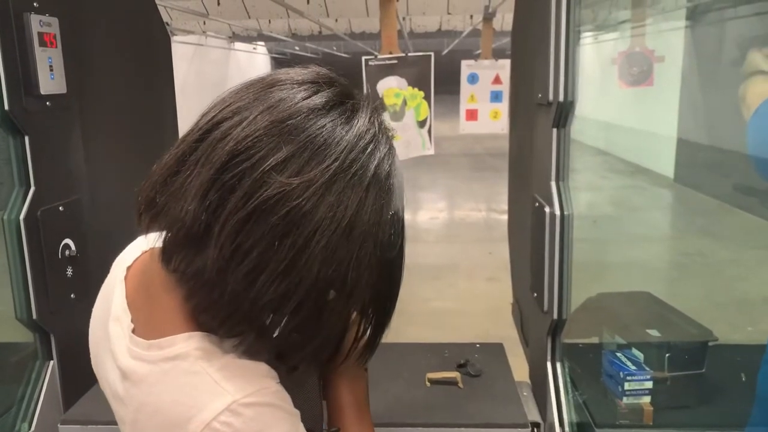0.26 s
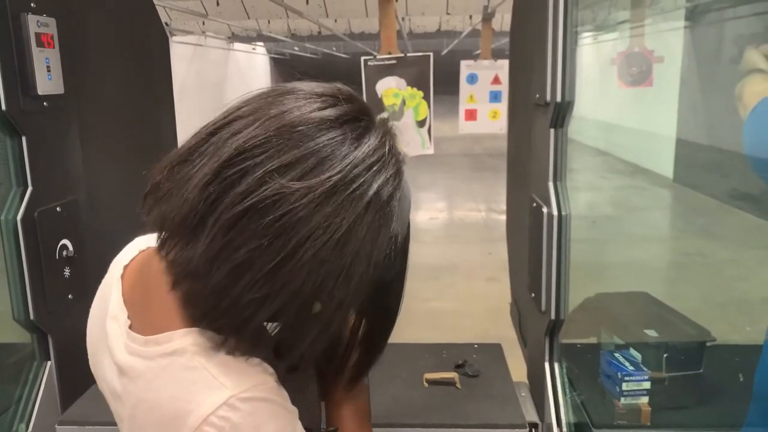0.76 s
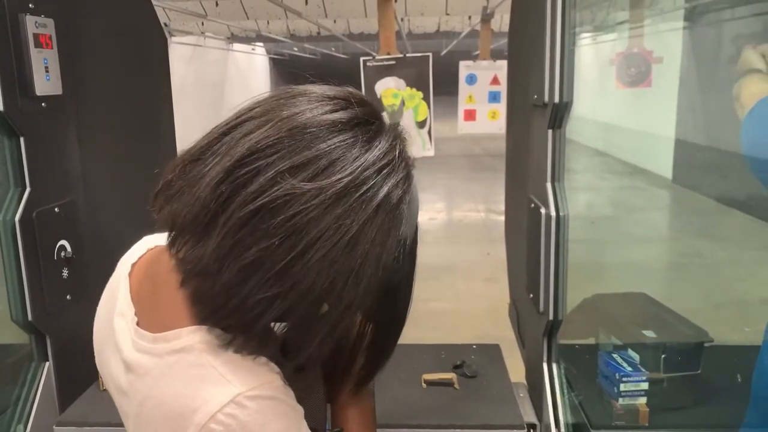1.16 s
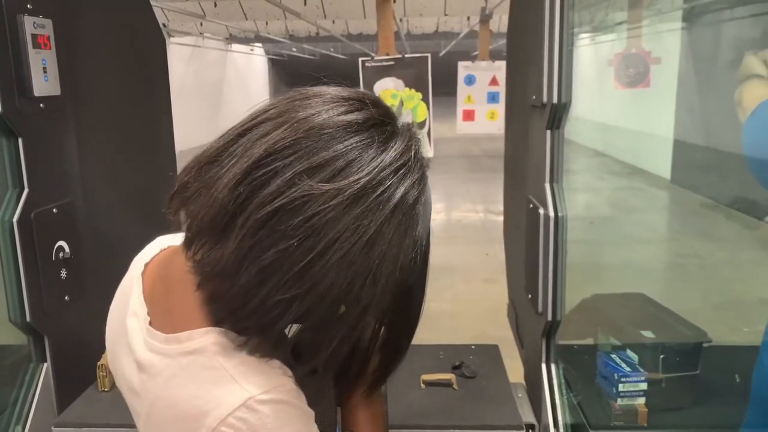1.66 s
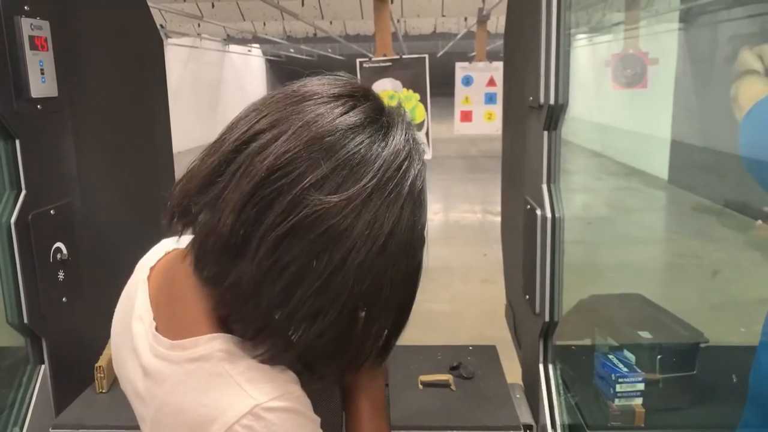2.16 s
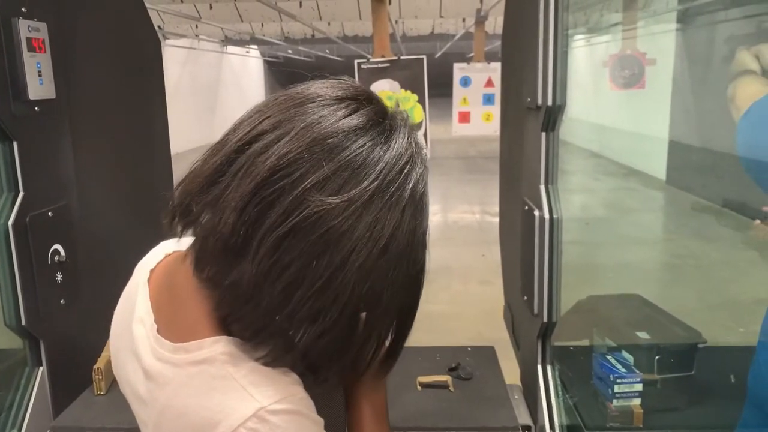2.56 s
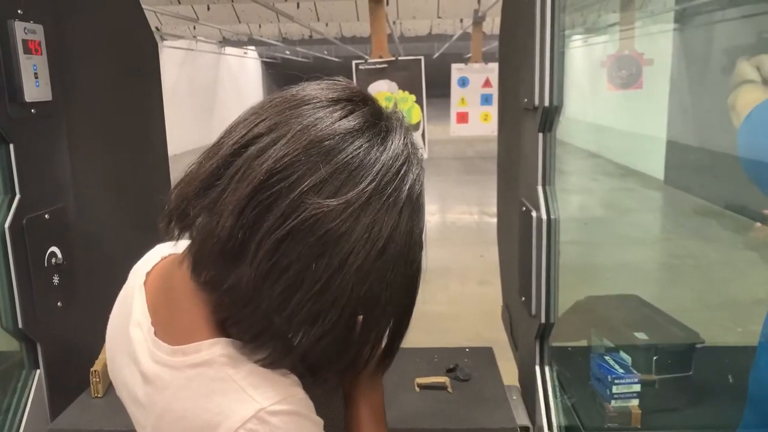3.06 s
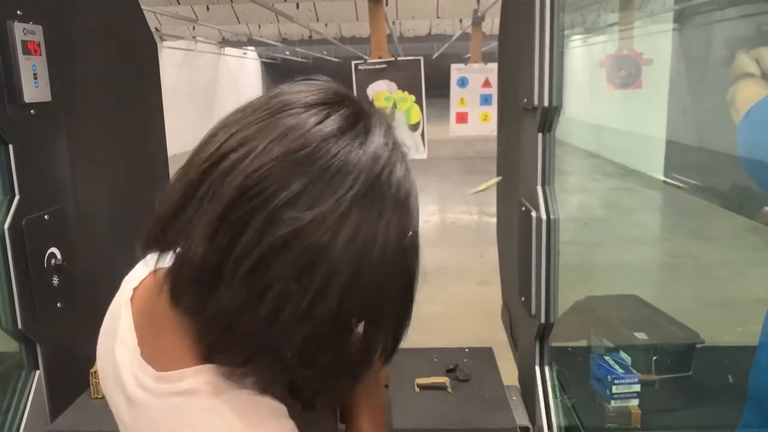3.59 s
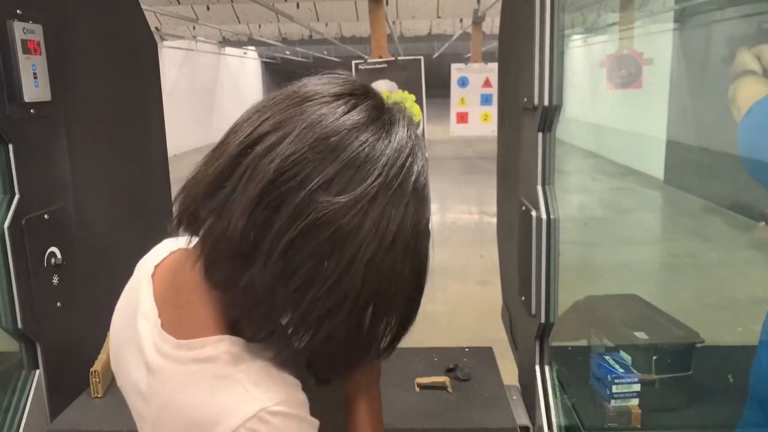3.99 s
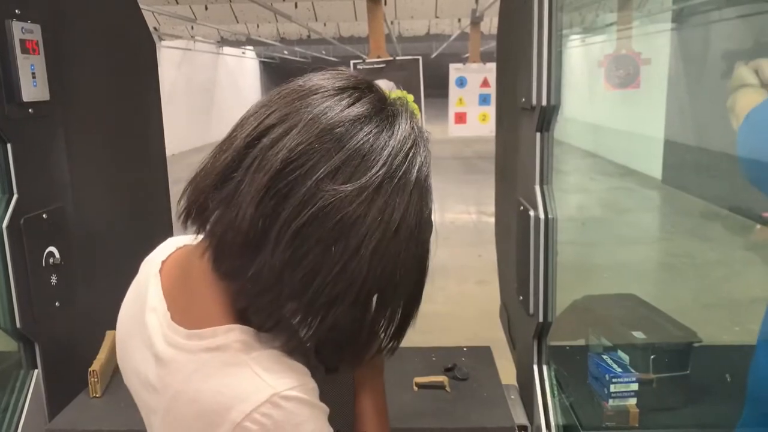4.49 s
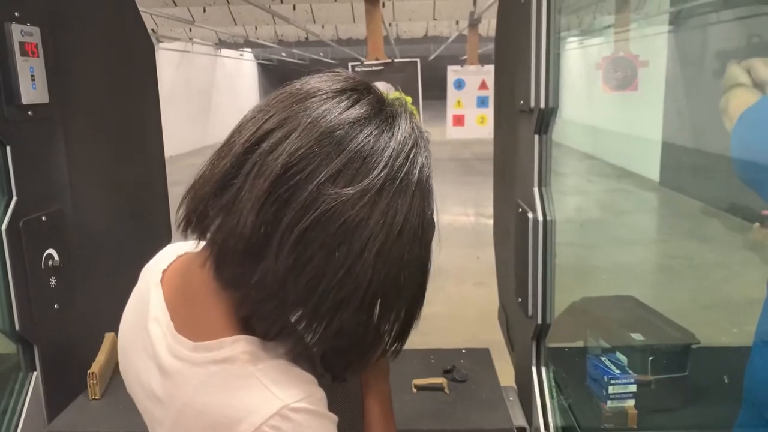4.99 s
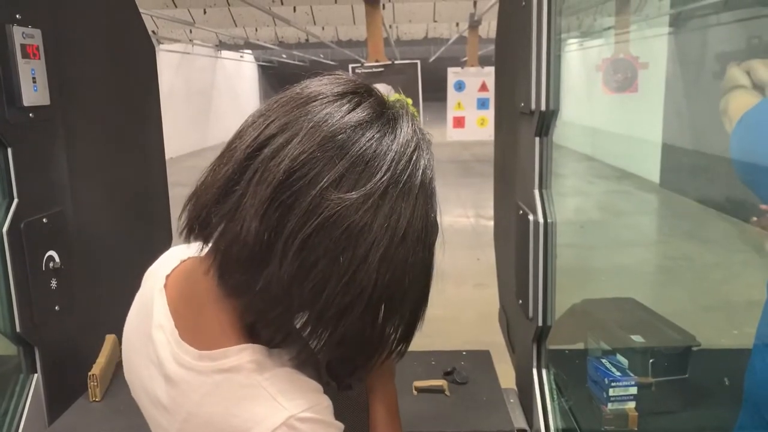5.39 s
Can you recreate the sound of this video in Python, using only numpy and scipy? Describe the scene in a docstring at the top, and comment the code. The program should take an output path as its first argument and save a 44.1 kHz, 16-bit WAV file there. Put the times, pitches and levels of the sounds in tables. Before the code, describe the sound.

The sound opens on the ringing tail of a rifle shot in an indoor shooting range, heard in wide stereo from inside a booth. Loud, sharp rifle shots follow from three neighbouring lanes, each lane slightly different in tone, at about 1.2, 1.6, 2.5 and 3.3 seconds, then a quick pair at 3.9 and 4.0. Each blast rattles briefly around the booths, slaps back from the far end and rings through the hall for a second or two. The shot at 3.3 seconds has a heavier, swelling echo. Spent brass cases tick very faintly on the floor early on, then tinkle more clearly with thin, high pings at about 4.6 and 5.0 seconds, followed by small bounces. One last shot cracks at about 5.6 seconds, right at the end. A faint, low ventilation hum continues underneath.

```python
"""First the ringing tail of a rifle shot, then more shots from three neighbouring lanes of an indoor range.
The microphone stands in a booth. Each blast rattles round the nearby booths and dies fast; a slap
returns from the far end of the hall. The long tail is held down just after the blast, then swells
back up after the slap. Shots from one lane share their echoes.
Spent brass cases tinkle on the floor over the hum of the ventilation."""
import sys
import numpy as np
from scipy import signal
from scipy.fft import rfft, irfft
from scipy.io import wavfile
from scipy.ndimage import uniform_filter1d

SR = 44100
rng = np.random.default_rng(int(sys.argv[2]) if len(sys.argv) > 2 else 0)


def waveform_to_disk(signal):
    """Save audio, clipped to [-1, 1], as 16-bit WAV at the path in sys.argv[1]."""
    frames = np.transpose(np.atleast_2d(signal))
    scaled = np.clip(frames, -1, 1) * 32767
    samples = np.round(scaled).astype(np.int16)
    wavfile.write(sys.argv[1], SR, samples)


N = 248708

# Rifle shots: start_s, lane, blast_db, tail_db
RIFLE_SHOTS = [(-.3, 0, -12, -31), (1.183, 0, -15, -29.5), (1.601, 1, -11.5, -27.5), (2.506, 0, -13.5, -28),
               (3.297, 2, -14, -18.5), (3.872, 1, -12, -32), (3.984, 0, -15, -31.5), (5.64, 0, -16.5, -22)]
# Muzzle blast at the microphone, a list per lane: frequency_hz, relative_density_db
BLAST_SPECTRA = [
    [(24, -32), (40, -7), (353, -8), (616, -10), (699, -8), (971, -3), (1190, -10), (3030, -18),
     (5430, -18.5), (6320, -20.5), (8350, -29), (10500, -24.5), (15300, -31.5), (17000, -52)],
    [(24, -36.5), (40, -8), (207, -9), (353, -10), (543, -21), (616, -1.5), (735, -1.5), (1130, -10.5),
     (5160, -24.5), (6480, -22.5), (8790, -32.5), (9970, -25), (15300, -33.5), (17000, -84)],
    [(24, -50), (40, -5.5), (183, -9.5), (311, -23.5), (556, -5), (681, -12), (1160, -14), (1530, -18),
     (5300, -24.5), (7180, -25.5), (8570, -39), (9720, -29.5), (15300, -34), (17000, -66.5)],
]
# Course of a shot from each lane: rise_s, blast_bass_db, partition_echo_db, slap_s, swell_s,
# tail_tilt_db_per_octave, before_swell_db
LANE_COURSES = [(0.0018, -4.5, -2, 0.1579, 0.046, 0.2, -1), (0.0029, -4, -12.5, .144, 0.04, 1.52, 6.5),
                (0.0024, -1.5, -24.5, .119, 0.34, 2.5, -9)]
# Attack and ring of each lane: booth_ring_factor, booth_build_s, knock_over_slap_db,
# slap_tilt_db_per_octave, crack_db
LANE_CHARACTER = [(1.2, .002, 5.5, 0.27, 2.5), (1.2, 0.0034, 9.5, 1, -6), (1.5, .012, 2.5, 1.5, 1.5)]
# Balance of each lane: booth_ring_db, slap_db, tilt_db_per_octave, tail_bass_db
LANE_BALANCE = [(-4, -12.5, 1.49, 3.2), (-3, -10.5, -0.52, 0), (0, -8.5, 1.37, 11.5)]
# Bass comes round the partitions later: frequency_hz, delay_s
PARTITION_DELAY = [(100, 0.012), (600, 0.01095), (2000, 0.0017), (8000, 0.0013)]
# Decay of the quick echoes round the booths: frequency_hz, t60_s
BOOTH_DECAY = [(60, 0.94), (250, .3), (800, 0.17), (3000, 0.24), (8000, 0.23), (15000, .2)]
# Booth resonances on the way to the microphone, a list per lane: pitch_hz, base_width_hz, weight_db
BOOTH_MODES = [
    [(97, 91, 13), (570, 30, 8), (910, 68, -10.5), (1320, 30, -11.5), (2180, 11, -15), (2830, 13, 2),
     (2960, 27, -16), (3180, 71, -14.5), (4100, 65, -1), (5300, 86, -11.5)],
    [(80.7, 89, -2.5), (403, 19, 0), (701, 47, -5), (1035, 11, -1.5), (1423, 210, -9), (1445, 25, -13),
     (2000, 37, -14), (2400, 75, -19), (2900, 29, -16.5), (4270, 66, -6.5)],
    [(100, 5.7, 0), (170.5, 36, -8), (510, 20, 9.5), (546.4, 10, 3.5), (704, 25, -7), (800, 39, -10.5),
     (1533, 64, 10.5), (1820, 22, -1), (2580, 62, -12), (3160, 22, -5)],
]
# Decay of the slap from the far end: frequency_hz, t60_s
SLAP_DECAY = [(250, 0.21), (800, 0.28), (3000, 0.28), (12000, 0.15)]
# Colour of the slap against the blast: frequency_hz, gain_db
SLAP_TONE = [(80, 5.5), (300, -5.5), (800, -1.5), (3000, 0), (12000, -3.5)]
# Knock in the slap, a list per lane: pitch_hz, base_width_hz, weight_db
KNOCK_MODES = [
    [(724, 74, 13.5), (1170, 10, -8), (1335, 22, 0), (1740, 220, -28), (2230, 33, -54)],
    [(658.5, 23, 7), (1120, 130, -5), (1466, 23, -6.5), (1980, 78, -8.5), (2370, 47, -10)],
    [(576, 120, -5), (838, 19, 0), (1250, 44, 1), (1530, 65, 5), (2120, 58, -3)],
]
# Long tail of the hall: frequency_hz, relative_density_db
HALL_SPECTRUM = [(18, -42.5), (30, -23.5), (76, -6.5), (151, -2.5), (425, -20.5), (686, 0), (1110, -10),
                 (1230, -10.5), (1980, -19.5), (6710, -30), (8520, -41), (11100, -36), (13400, -76.5),
                 (14500, -47), (17000, -101)]
# Decay of that tail: frequency_hz, t60_s
HALL_DECAY = [(50, 3.26), (120, 1.67), (300, 2.15), (700, 1.59), (1500, 1.584), (3000, 1.656),
              (6000, 1.215), (10000, 0.66), (15000, 0.65)]
# How far the tail is held down just after the blast: frequency_hz, gain_db
TAIL_DIP = [(80, -18), (300, -3.5), (1000, -11.5), (8000, -12)]
# Stereo width at the microphone: frequency_hz, side_minus_mid_db
STEREO_WIDTH = [(60, -5.5), (110, -29), (200, -5), (380, 10.5), (700, -1.5), (1290, -2), (2380, -0.5),
                (4400, -1), (8120, 1.5), (15000, -2.5)]
# Cases hit the floor: start_s, landing (0 wide case, 1 slim on its rim, 2 slim flat), ring_db, tick_db
CASE_DROPS = [(.451, 0, -71, -62), (.71, 0, -75, -89), (.86, 0, -84, -95), (.96, 0, -82, -95),
              (2.464, 0, -66, -49), (3.124, 0, -66, -55), (4.551, 1, -42, -50), (4.679, 0, -73, -56),
              (4.682, 2, -70, -75), (4.972, 1, -33.5, -53.5), (5.195, 2, -67, -69), (5.275, 1, -56, -66),
              (5.315, 2, -75, -70), (5.394, 0, -71, -73), (5.488, 2, -58, -68), (5.618, 2, -57, -58)]
# Modes of a brass case: pitch_hz, base_t60_s, wide_db, slim_rim_db, slim_flat_db
BRASS_MODES = [(10020, .45, 0, -48, -30), (10660, .4, -20, -31, -7), (14940, .36, -20, 0, -3),
               (15220, .28, -22, -16, 0)]
# Ventilation hum: frequency_hz, relative_density_db
VENT_SPECTRUM = [(15, -48.5), (25, -17.5), (65, 6), (261, -1.5), (427, -36), (576, -17.5), (643, -6),
                 (717, -9), (799, -14), (1670, -21), (1810, -20), (2450, -28.5), (17000, -59)]
# Notches of the microphone housing: centre_hz, width_hz, gain_db
HOUSING_NOTCHES = [(5430, 400, -8.5), (8550, 240, -19.5), (13430, 750, -15.5), (16700, 500, -14.5)]

SHOT_SAMPLES, STEP_SAMPLES, LEAD_S = 3 * SR, 32, .05  # one shot, its envelope step, time before the blast
TAPS_PER_S, PARTITION_ECHO_S = 14000, .041
TICK_T60_S, TICK_TAIL_DB, TICK_TAIL_T60_S = .02, -25.5, .15
QUICK_FACTOR, SLOW_FACTOR, SLOW_DB, WAVER_DEPTH = .4, 1.5, -13.5, .3  # brass fades in two stages
VENT_DB, BAND_LIMIT_HZ = -61.5, 16900


def rifle_shots():
    """Blast, booth ring, knock and hall tail, in mid and side; one set of echoes for each lane."""
    out = np.zeros((2, N + 2 * SHOT_SAMPLES))
    shape = (2, SHOT_SAMPLES)
    for lane, course in enumerate(LANE_COURSES):
        ring_factor, build_s, knock_db, slap_tilt, crack_db = LANE_CHARACTER[lane]
        ring_db, slap_db, tilt, tail_bass_db = LANE_BALANCE[lane]
        # Early echoes are separate taps of uneven size; the tail is dense.
        taps = rng.standard_normal(shape) * (rng.random(shape) < TAPS_PER_S / SR)
        early = split_bands(coloured(taps, BLAST_SPECTRA[lane]))
        dense = split_bands(coloured(rng.standard_normal(shape), HALL_SPECTRUM))
        dense = hall_drift(dense, depth_db=1.9)
        booth = resonances(BOOTH_MODES[lane], LEAD_S, ring_factor, build_s)
        knock = resonances(KNOCK_MODES[lane], LEAD_S + course[3], ring_factor=.84, build_s=.003)
        blast = shaped(early, blast_power, course, slap_db, tilt, slap_tilt, crack_db)
        blast = blast + gain_of(ring_db) * booth + gain_of(slap_db + knock_db) * knock
        tail = shaped(dense, hall_power, course, tilt, tail_bass_db)
        for start_s, shot_lane, blast_db, tail_db in RIFLE_SHOTS:
            if shot_lane == lane:
                at = SHOT_SAMPLES + round((start_s - LEAD_S) * SR)
                out[:, at:at + SHOT_SAMPLES] += gain_of(blast_db) * blast + gain_of(tail_db) * tail
    return out[:, SHOT_SAMPLES:SHOT_SAMPLES + N]


def blast_power(t, hz, course, slap_db, tilt, slap_tilt, crack_db):
    """Muzzle blast with quick booth echoes close by, one partition echo, and the slap from the far end."""
    rise_s, bass_db, echo_db, slap_s = course[:4]
    late_s = value_at(PARTITION_DELAY, hz)
    burst = rise_and_fall(t - late_s, rise_s / (1 + (hz / 6000) ** 2) + .1 * late_s,
                          value_at(BOOTH_DECAY, hz))
    crack = rise_and_fall(t - .5 * late_s, .0004, .09)  # the first arrivals stand out
    burst *= 1 + gain_of(2 * crack_db) * crack
    echo = rise_and_fall(t - PARTITION_ECHO_S, .0004 + .2 * late_s, .025)
    burst += gain_of(2 * echo_db) * echo * hz / (hz + 3000)
    slap = rise_and_fall(t - slap_s - .002, .0015 + .15 * late_s, value_at(SLAP_DECAY, hz))
    slap_db = slap_db + value_at(SLAP_TONE, hz) + tone_db(hz, tilt + slap_tilt, 0)
    return gain_of(2 * tone_db(hz, tilt, bass_db)) * burst + gain_of(2 * slap_db) * slap


def resonances(modes, start_s, ring_factor, build_s):
    """Room modes build up over milliseconds, and wide ones die sooner; mid and side differ in phase."""
    hz, width_hz, weight_db = np.transpose(modes)[:, :, None]
    t = np.maximum(np.arange(SR // 2) / SR - start_s - .548 * value_at(PARTITION_DELAY, hz), 0)
    phase = rng.random((2, *hz.shape))
    rings = gain_of(weight_db) * np.sqrt(width_hz / 50) * np.sin(2 * np.pi * (hz * t + phase))
    rings *= gain_of([0 * hz, value_at(STEREO_WIDTH, hz) - 4.5])
    envelope = (1 - np.exp(-t / build_s)) * np.exp(-np.pi * width_hz * t / ring_factor)
    return np.pad((rings * envelope).sum(1), ((0, 0), (0, SHOT_SAMPLES - SR // 2)))


def hall_power(t, hz, course, tilt, bass_db):
    """The long tail is held down just after the blast, then swells back up after the slap."""
    slap_s, swell_s, tail_tilt, before_db = course[3:]
    t60_s = value_at(HALL_DECAY, hz)
    held = min(gain_of(2 * (value_at(TAIL_DIP, hz) + before_db)), 1)
    swell = held + (1 - held) * (1 - np.exp(-(np.maximum(t - slap_s, 0) / swell_s) ** 2))
    level_db = 60 * slap_s / t60_s + tone_db(hz, tilt + tail_tilt, bass_db)
    return gain_of(2 * level_db) * swell * rise_and_fall(t, .0018, t60_s)


def hall_drift(bands, depth_db):
    """Each band of the tail swells and sags by chance as echoes run up and down the hall."""
    noise = rng.standard_normal((len(bands), SHOT_SAMPLES // STEP_SAMPLES + 1))
    drift = uniform_filter1d(noise, size=60) * np.sqrt(60)
    drift = np.repeat(uniform_filter1d(drift, size=20), STEP_SAMPLES, axis=1)[:, :SHOT_SAMPLES]
    return [(hz, sound * gain_of(depth_db * row)) for (hz, sound), row in zip(bands, drift)]


def brass_cases():
    """A thin tick on the floor, then the tube rings and wavers as it rolls; each ear has its own phase."""
    out, t = np.zeros((2, N + SR)), np.arange(SR // 2) / SR
    count = len(CASE_DROPS)
    tick_band = signal.butter(2, [4500., 12000.], "band", fs=SR, output="sos")
    ticks = signal.sosfilt(tick_band, rng.standard_normal((count, 2, len(t))))
    tick_fade = gain_of(-60 * t / TICK_T60_S) + gain_of(TICK_TAIL_DB - 60 * t / TICK_TAIL_T60_S)
    rolls = uniform_filter1d(rng.standard_normal((count, len(t))), size=500) * np.sqrt(500)
    phases = rng.random((count, len(BRASS_MODES), 2, 1))
    attack = 1 - np.exp(-t / .0018)
    for (start_s, landing, ring_db, tick_db), tick, roll, turns in zip(CASE_DROPS, ticks, rolls, phases):
        sound = gain_of(tick_db) * tick_fade * tick
        for (hz, t60_s, *mode_db), turn in zip(BRASS_MODES, turns):
            quick = gain_of(-60 * t / (QUICK_FACTOR * t60_s))
            slow = gain_of(SLOW_DB - 60 * t / (SLOW_FACTOR * t60_s))
            level = gain_of(ring_db + mode_db[landing]) * (1 + WAVER_DEPTH * roll)
            sound += level * attack * (quick + slow) * np.sin(2 * np.pi * (hz * t + turn))
        out[:, round(start_s * SR):][:, :len(t)] += sound
    return out[:, :N] * gain_of([[-.7], [.7]])


def ventilation():
    """Steady low rumble behind everything, in mid and side."""
    return gain_of(VENT_DB) * irfft(coloured(rng.standard_normal((2, N)), VENT_SPECTRUM), N)


def gain_of(db):
    """Decibels to an amplitude factor; twice the decibels give power."""
    return 10 ** (np.asarray(db) / 20)


def value_at(table, hz):
    """Reads a table on a log-frequency axis."""
    table_hz, values = np.transpose(table)
    return np.interp(np.log(hz + 1), np.log(table_hz + 1), values)


def tone_db(hz, db_per_octave, bass_db):
    """Treble slope above 1 kHz and a bass shelf below 300 Hz."""
    return db_per_octave * np.log2(max(hz, 1000) / 1000) + bass_db / (1 + (hz / 300) ** 2)


def rise_and_fall(t, rise_s, t60_s):
    """Power that builds up to its top at t = 0 and then falls 60 dB in t60_s."""
    rise = np.exp(np.minimum(t, 0) / np.clip(rise_s, 1e-4, .02))
    return np.where(t < 0, rise, 10 ** (-6 * np.maximum(t, 0) / t60_s))


def coloured(noise, colour):
    """Spectra of mid and side for a raw noise pair; the mid has rms 1."""
    hz = np.fft.rfftfreq(noise.shape[1], 1 / SR)
    spectra = rfft(noise) * gain_of(value_at(colour, hz))
    spectra /= np.sqrt(2 * np.sum(abs(spectra[0]) ** 2)) / noise.shape[1]
    return spectra * gain_of([0 * hz, value_at(STEREO_WIDTH, hz)])


def split_bands(spectra, count=13):
    """Splits spectra into overlapping bands: pairs of centre_hz and sound."""
    size = 2 * (spectra.shape[1] - 1)
    log_hz = np.log(np.fft.rfftfreq(size, 1 / SR) + 1)
    centres_hz = np.geomspace(50, 15000, count)
    weights = [np.interp(log_hz, np.log(centres_hz), row) for row in np.eye(count)]
    return [(hz, irfft(spectra * weight, size)) for hz, weight in zip(centres_hz, weights)]


def shaped(bands, power, *settings):
    """Gives each band its own course of power in time; the shot falls at LEAD_S."""
    t = np.arange(0, SHOT_SAMPLES, STEP_SAMPLES) / SR - LEAD_S
    return sum(sound * np.repeat(np.sqrt(power(t, hz, *settings)), STEP_SAMPLES)[:SHOT_SAMPLES]
               for hz, sound in bands)


def scene():
    """The range from the booth: mid and side become left and right, and the brass joins them."""
    mid, side = rifle_shots() + ventilation()
    return np.array([mid + side, mid - side]) * gain_of([[-.4], [.4]]) + brass_cases()


def record(dry):
    """The input saturates softly on blasts; the microphone has notches and drops deep bass and top treble."""
    saturated = 1.05 * np.tanh(dry / 1.05)
    hz = np.fft.rfftfreq(N, 1 / SR)
    notches_db = sum(db * np.exp(-((hz - centre) / width) ** 2) for centre, width, db in HOUSING_NOTCHES)
    notched = irfft(rfft(saturated) * gain_of(notches_db), N)
    thinned = signal.sosfilt(signal.butter(4, 52., "high", fs=SR, output="sos"), notched)
    band_limit = signal.firwin(511, BAND_LIMIT_HZ, window=("kaiser", 9), fs=SR)
    return signal.oaconvolve(thinned, band_limit[None], "same")


dry = scene()
out = record(dry)
waveform_to_disk(out)
```